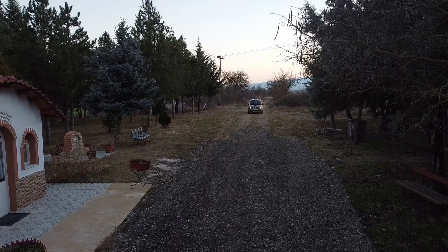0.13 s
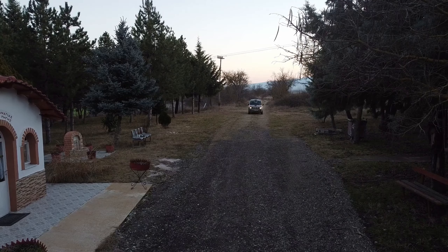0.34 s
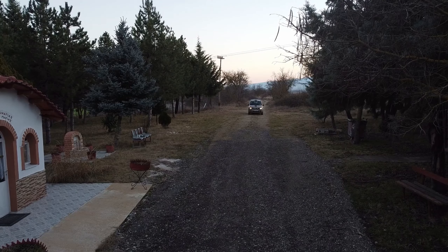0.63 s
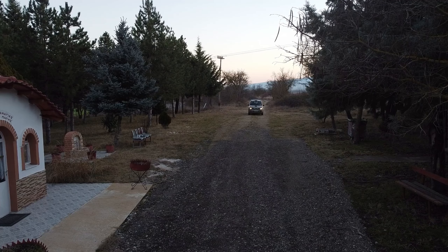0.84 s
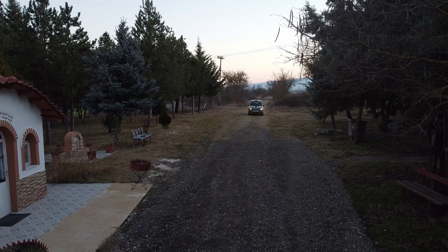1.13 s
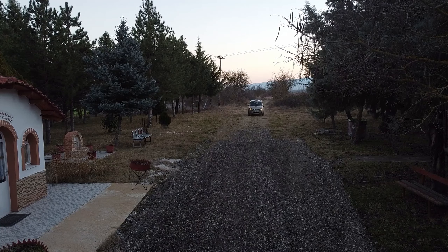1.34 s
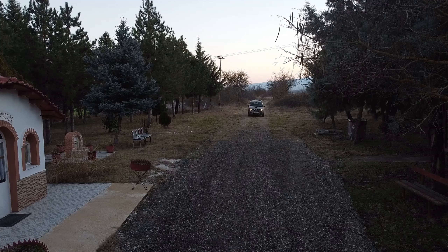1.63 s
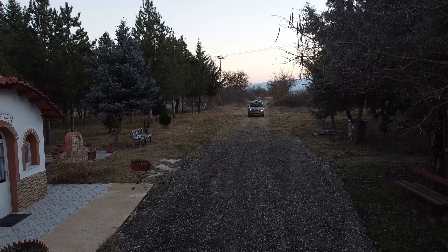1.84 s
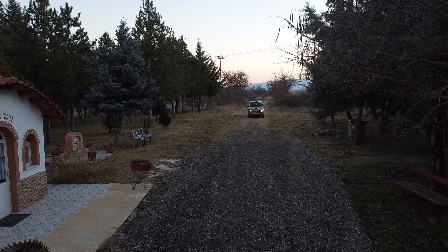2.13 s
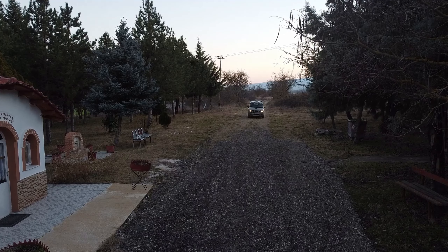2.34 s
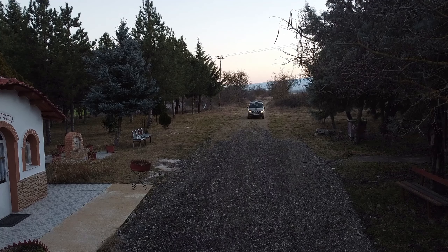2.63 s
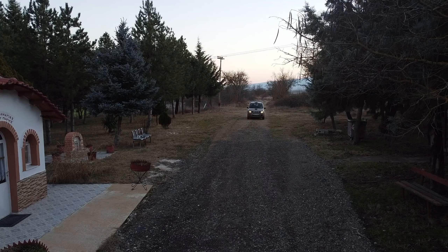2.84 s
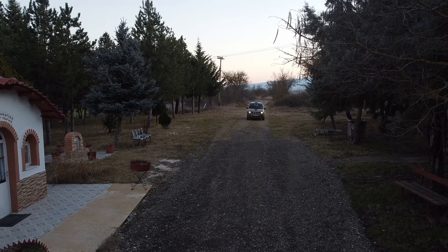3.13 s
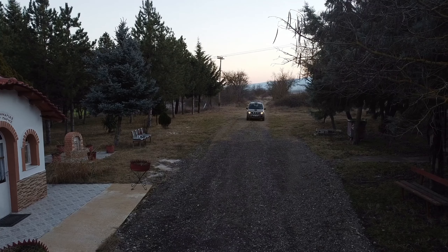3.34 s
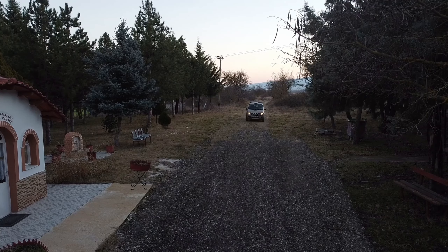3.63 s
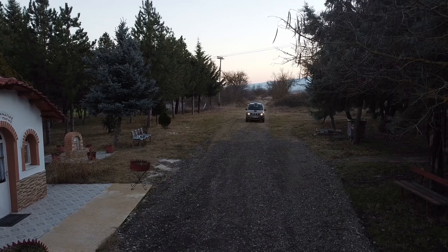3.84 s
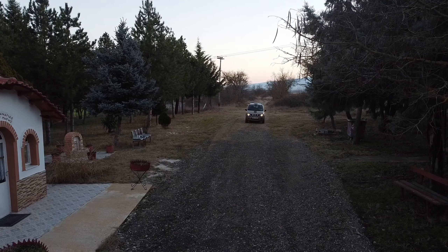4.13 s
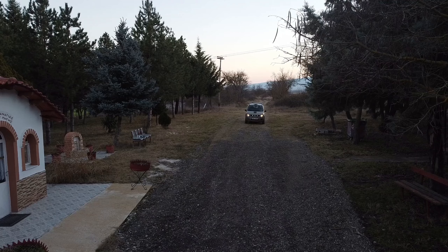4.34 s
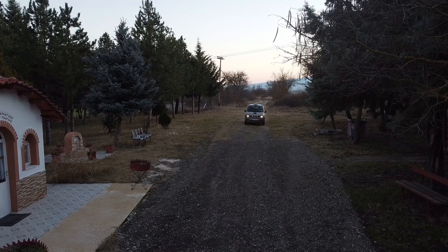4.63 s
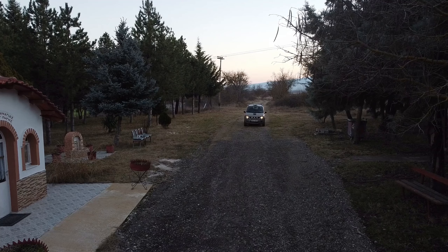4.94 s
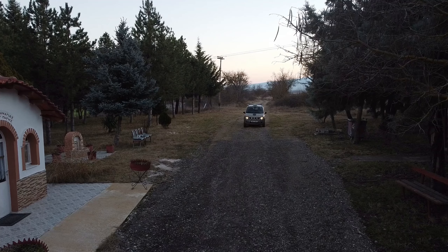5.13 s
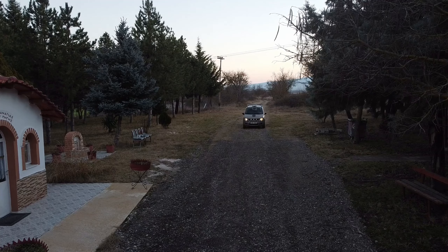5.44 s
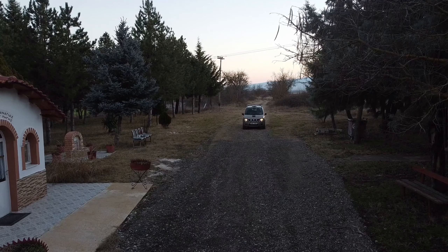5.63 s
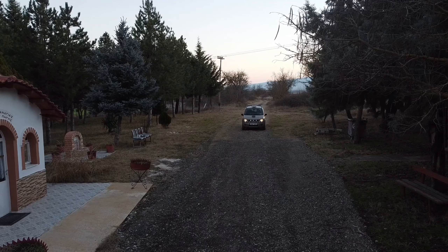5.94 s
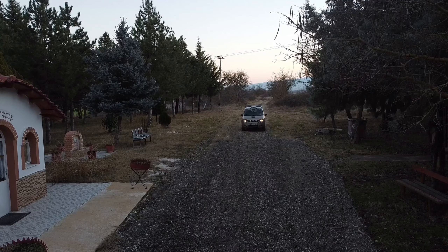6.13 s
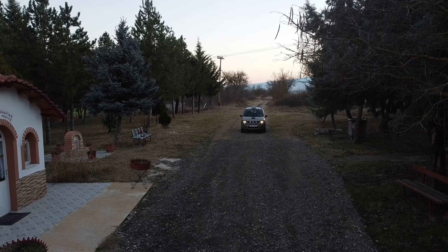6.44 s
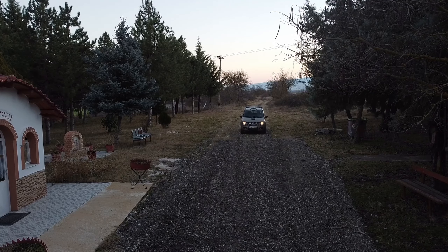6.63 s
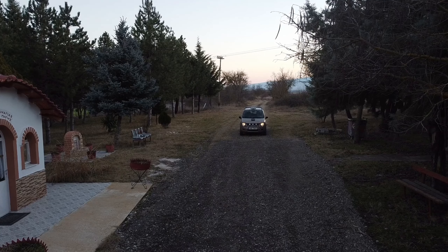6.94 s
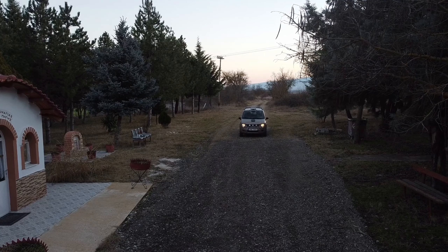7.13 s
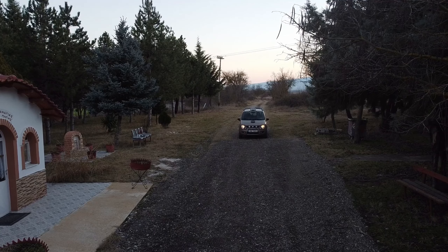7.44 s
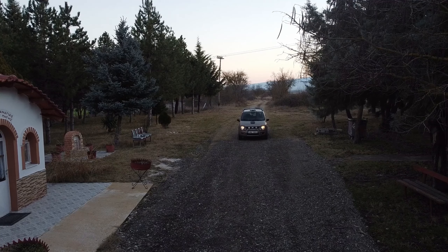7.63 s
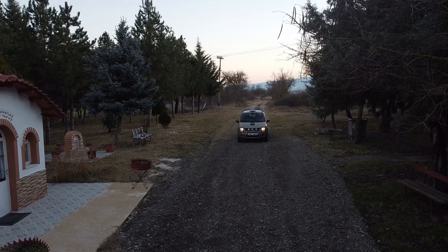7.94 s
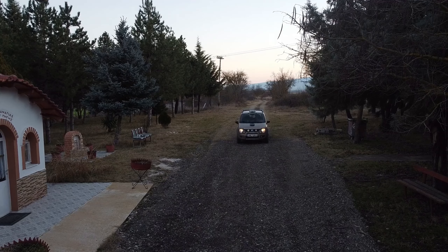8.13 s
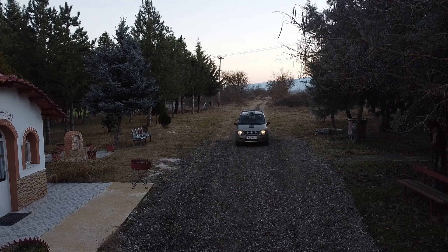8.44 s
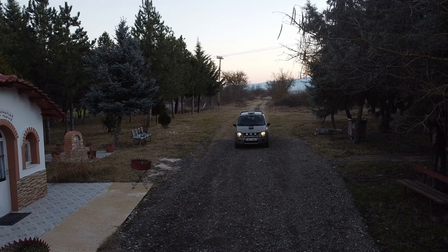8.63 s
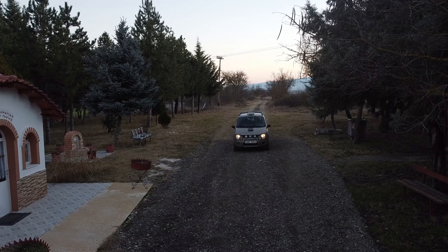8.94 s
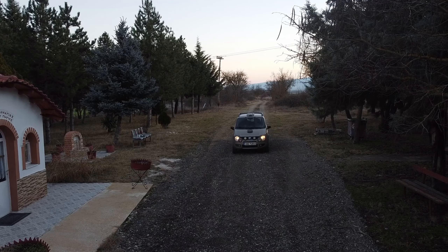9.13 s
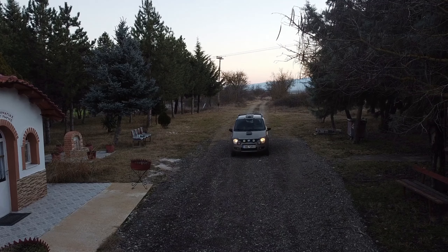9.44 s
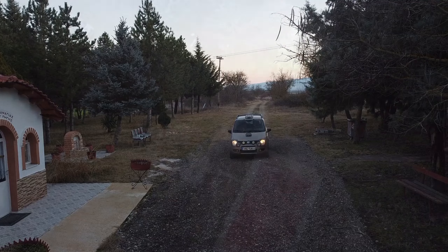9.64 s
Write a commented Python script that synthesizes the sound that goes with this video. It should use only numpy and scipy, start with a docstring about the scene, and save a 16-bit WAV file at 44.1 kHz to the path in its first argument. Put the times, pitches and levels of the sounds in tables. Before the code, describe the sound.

Quiet open air, and a car's tyres quickly begin crunching loose gravel, heard close and dry, with a slight stereo spread. From 0.5 seconds blunt stone pops multiply; a heavy one lands at 1.5, and crunching is densest around 1.5 to 2.7. Beneath, a low engine hum slides down in pitch over the first four seconds, then holds and throbs about three times a second over soft tyre rumble. Bright chips tick at 3.0 and 3.2, and a tight burst of hard snaps comes at 4.4. Sparser pops, grit and ticks continue, with one clear tick at 6.6. After 7.1 the engine and gravel ease, fading almost away by 8.7, with soft low thumps near 8.9 and 9.1. At 9.3 a close, quiet idle cuts in abruptly: steady low tones, grainy clatter, a few knocks and faint thin whines to the end.

```python
"""Outdoors on a loose gravel track, a car rolls slowly and eases to a crawl.
Stones crunch over fine grit as filtered random impulses; popped stones are blunt clicks that ring the tyre.
Flung chips tick as bright resonant clicks. The engine is four gliding tones that sink, throb and fade.
Shaped noise gives tyre rumble and air, decaying sines give soft thumps, wavering sines give faint whines.
Near the end a close idle cuts in: low steady tones, grainy clatter and a few knocks, with a thin whine."""
import sys
import numpy as np
from scipy import signal
from scipy.fft import rfft, irfft, next_fast_len
from scipy.io import wavfile
from scipy.ndimage import uniform_filter1d

SR = 44100
rng = np.random.default_rng(int(sys.argv[2]) if len(sys.argv) > 2 else 0)


def wrap_up_sound(samples):
    """Save the sound to the file named by the first command line argument, as 16-bit audio."""
    columns = np.atleast_2d(samples).T
    # keep every value between -1 and 1, then stretch to whole-number steps
    tamed = np.clip(columns, -1, 1)
    steps = np.round(tamed * 32767).astype(np.int16)
    wavfile.write(sys.argv[1], SR, steps)


N = 430857
T = np.arange(N) / SR
TAP_HZ = np.fft.rfftfreq(1024, 1 / SR)  # frequencies at which clicks and filters are drawn


# how hard the tyres work the gravel, before trims and swells:
# time_s (values glide between rows), crunch_db, grit_db
GRAVEL_LEVELS = [(0, -44, -53), (.55, -36, -50.5), (1.05, -37.5, -49.5), (1.35, -33, -48.5),
                 (1.9, -32.5, -48), (2.35, -29.5, -45), (2.8, -35.5, -47), (3.7, -36, -48.5),
                 (4.5, -34, -50), (5.05, -38.5, -50.5), (5.9, -37.5, -51), (6.7, -34, -48.5),
                 (7.1, -35.5, -49), (7.5, -37, -53.5), (8, -41.5, -56.5), (8.38, -49, -61),
                 (8.56, -59, -71), (8.75, -65, -76.5), (8.85, -58, -62), (9.27, -74, -74)]
# spectrum of the crushed stones: pitch_hz, level_db (relative, per Hz)
CRUNCH_SPECTRUM = [(100, -17.5), (230, 0), (380, 0), (490, 4), (580, -2), (730, -1), (830, -3.5),
                   (1000, 1.5), (1150, -3.5), (1580, -6.5), (1760, -17.5), (2500, -16.5), (4000, -32.5),
                   (9000, -50)]
# spectrum of the fine grit: pitch_hz, level_db (relative, per Hz)
GRIT_SPECTRUM = [(700, -34.5), (1800, 7), (2700, 2.5), (4000, -2.5), (6000, -8.5), (8000, -12.5),
                 (9900, -19), (10700, -17), (12500, -24), (16000, -28)]


def gravel(grit_trim_db=1.5, crunch_clump_db=1.13, grit_clump_db=1.5, lurch_db=0.88):
    """The tread crushes stones in clumps; each clump also stirs the fine grit."""
    clumps = crumbles(per_s=55, fade_s=.012)
    grit_clumps = evened(clumps + wander(per_s=50))
    lurch = lurch_db * wander(per_s=9)
    crunch_swell, grit_swell = swells_and_lulls() + lurch
    crunch = grains(CRUNCH_SPECTRUM, per_s=1300, spread_db=2.9, low_hz=380, high_hz=3000,
                    focus_db=16, bed=.5, ring_q=12)
    grit = grains(GRIT_SPECTRUM, per_s=1300, spread_db=3.0, low_hz=1700, high_hz=10000,
                  focus_db=16, bed=.55, smooth_hz=8000, ring_q=40, count=40)
    crunch *= gain_of(curve(GRAVEL_LEVELS) + crunch_swell + crunch_clump_db * clumps)
    grit_level_db = curve(GRAVEL_LEVELS, column=2) + grit_swell + grit_trim_db
    grit *= gain_of(grit_level_db + grit_clump_db * grit_clumps)
    return crunch + grit


# brief swells and lulls in the gravel: middle_s, length_s, crunch_swell_db, grit_swell_db
GRAVEL_SWELLS = [(0.146, 0.12, 6.5, 1.5), (0.626, .14, 3, 1.5), (1.43, 0.11, 4.5, -1.5),
                 (1.594, .08, -2.5, -1), (1.67, 0.097, 4.5, 1), (1.792, .08, 1, 1), (1.994, .07, 3, 1.5),
                 (2.116, 0.062, 4, 1), (2.228, 0.055, -2.5, -2), (2.39, 0.056, 2, 2), (3.563, 0.11, 2.5, 3),
                 (3.7, 0.16, 6.5, 2), (4.39, 0.19, 6, 6), (4.676, 0.09, 4.5, 3.5), (5.543, 0.22, 3.5, 5),
                 (5.723, 0.088, 2, 6), (5.931, .2, 1.5, -4), (6.172, 0.26, 2, 1), (6.807, 0.16, 0, 4.5),
                 (7.1, 0.14, 3.5, 0.5), (8.21, 0.13, 0, 3)]


def swells_and_lulls():
    """Each row is a smooth swell or dip in dB, one for the crunch and one for the grit."""
    swells = np.zeros((2, N))
    for middle_s, length_s, crunch_db, grit_db in GRAVEL_SWELLS:
        bump = np.cos(np.pi * np.clip((T - middle_s) / length_s, -.5, .5)) ** 2
        swells += np.outer([crunch_db, grit_db], bump)
    return swells


def crumbles(per_s, fade_s):
    """Stones give way in clumps that start at once and die down: a level of mean 0 and rms 1."""
    slips = rng.uniform(0.37, 1, N) * (rng.random(N) < per_s / SR)
    energy = signal.lfilter([1], [1, -np.exp(-1 / (fade_s * SR))], slips)
    level = np.sqrt(energy)
    return evened(level - level.mean())


# knocks: stones popping from under a tyre, then (from 9.315 s) knocks in the idle:
# start_s, peak_db, brightness_hz, dullness_db (lost an octave above the brightness),
# ring_db (before trim)
KNOCKS = [(.379, -23, 1000, 12, -41), (0.4484, -13, 950, 5, -40), (.4587, -17, 800, 13, -46),
          (.602, -21, 950, 10, -40), (0.6068, -11, 1000, 6, -34), (0.6114, -16.5, 1030, 8, -35),
          (0.6258, -19, 800, 10, -40), (0.6494, -15.5, 1030, 4, -38), (0.6563, -17, 1450, 16, -42),
          (.692, -13, 990, 9, -35), (.7783, -12.5, 1150, 20, -34), (.785, -16.5, 1100, 16, -34),
          (1.1786, -18, 1500, 3, -46), (1.1963, -18.5, 1100, 10, -39.5), (1.3292, -15.5, 1327, 7, -43),
          (1.3446, -15, 870, 4, -42), (1.4056, -17, 980, 4, -27.5), (1.489, -4, 800, 7.5, -15.5),
          (1.4948, -11, 665, 11, -22), (1.5024, -17, 800, 5, -24), (1.516, -17, 900, 6, -24),
          (1.662, -27, 699, 6, -25), (1.745, -15.5, 1200, 9, -28), (1.7715, -18, 1000, 8, -33),
          (1.8216, -6.5, 790, 12, -22), (1.9828, -15.5, 793, 6, -36), (1.9904, -15, 1100, 12, -31),
          (2.1005, -21, 2190, 8, -44), (2.1127, -14, 1090, 6, -27), (2.1225, -14, 1100, 6, -33),
          (2.1522, -12.5, 680, 8, -25), (2.2005, -15, 1100, 12, -32), (2.274, -13, 600, 6, -24),
          (2.3256, -13, 942, 8, -31), (2.3933, -12.5, 1000, 8, -29), (2.441, -14, 600, 10, -25),
          (2.5234, -19, 1200, 4, -40), (2.611, -18, 1000, 8, -35), (2.6799, -21, 1100, 6, -38),
          (2.7015, -16.5, 1987, 3, -43), (3.1597, -20, 960, 5, -23), (3.1714, -12, 430, 6.5, -13),
          (3.55, -19, 1100, 4, -38), (3.8388, -16.5, 1000, 11, -35), (4.0768, -15, 950, 13, -25),
          (4.087, -19, 1000, 13, -27), (4.3626, -10.5, 1347, 8, -37), (4.3775, -16, 1300, 5, -40),
          (4.3815, -6, 1750, 9, -27), (4.3897, -10, 1260, 4, -21), (4.3986, -6.5, 990, 3.5, -24),
          (4.4075, -17, 1000, 9, -32), (4.4135, -15, 700, 7, -34), (4.421, -15, 1100, 10, -26),
          (4.4285, -19, 890, 9, -22), (4.4336, -18, 1100, 5, -35), (4.498, -32, 480, 9, -15),
          (4.6785, -21, 600, 9, -30), (4.6905, -11.5, 990, 10, -42), (4.8694, -23, 1597, 2.5, -46),
          (5.15, -23, 1960, 5, -41), (5.2294, -23, 1000, 10, -40), (5.2699, -21.5, 625, 5, -28),
          (5.344, -21.5, 1100, 14, -35), (5.5663, -19.5, 1100, 9, -38), (5.9252, -24, 1000, 8, -42),
          (6.1185, -17, 786, 6, -29), (6.1442, -17.5, 1170, 6, -41), (6.208, -21, 1100, 10, -37),
          (6.2142, -19, 1000, 13, -38), (6.3723, -21, 1100, 7, -39), (6.4995, -23, 1000, 8, -36),
          (6.792, -20, 1000, 7, -33), (6.9159, -17, 1150, 7, -44), (7.0545, -18, 1210, 6, -45),
          (7.092, -19, 750, 7, -32), (7.1116, -17, 1470, 9, -31), (7.199, -34, 587, 7, -25),
          (7.4641, -27, 800, 4, -31), (7.5946, -29, 550, 3, -24), (7.6997, -26, 700, 10, -29),
          (8.0568, -32, 1100, 10, -48), (8.1846, -30, 2202, 4, -58), (8.2628, -24, 1390, 17, -50),
          (8.301, -31, 960, 9, -50), (8.3451, -28, 1000, 11, -52), (8.387, -35, 1100, 9, -53),
          (8.517, -35.5, 900, 10, -58), (8.6127, -36.5, 1200, 14, -59), (8.788, -45, 950, 12, -60),
          (9.315, -31, 650, 8, -39), (9.353, -33, 950, 6, -42), (9.381, -28.5, 1700, 8, -43),
          (9.513, -43, 1200, 6, -52), (9.64, -33, 1100, 4, -46), (9.6942, -35, 1000, 10, -50)]
# the muffled colour of a knock, dull above the tyre's highest mode: pitch_hz, level_db (relative)
KNOCK_SPECTRUM = [(150, -5), (480, 5), (1550, 0.5), (1800, -7), (3300, -5.5), (3900, -11), (12000, -26.5)]
# what a struck tyre rings with: pitch_hz (before random detuning), level_db (relative), t60_s
TYRE_MODES = [(240, -11.5, 0.063), (350, -7, 0.04), (495, 1, 0.053), (618, -8, 0.03), (1030, -2, 0.083),
              (1570, -15, 0.024)]


def pops_and_knocks(ring_trim_db=3, low_loss_db=3, rattle_db=-9, reach_db=13, ring_rise_s=0.0013,
                    rattle_hz=2400, glance_db=2.0):
    """Popping stones, later knocks in the idle: a blunt click, a ring of low modes, a diffuse rattle."""
    snaps, rings, t = np.zeros(N), np.zeros(N), np.arange(SR // 8) / SR
    mode_hz, mode_db, t60_s = np.transpose(TYRE_MODES)[:, :, None]
    ring_rise = 1 - np.exp(-t / ring_rise_s)
    for start_s, peak_db, bright_hz, dull_db, ring_db in KNOCKS:
        away = octaves(bright_hz)
        loss_db = np.minimum(np.where(away < 0, low_loss_db, dull_db) * away ** 2, 50)
        snap = click(read(KNOCK_SPECTRUM, TAP_HZ) + facets(depth_db=3) - loss_db)
        snap *= gain_of(peak_db) * rng.choice([-1, 1]) / abs(snap).max()
        add(snaps, start_s - np.argmax(abs(snap)) / SR, snap)  # the peak lands on start_s
        # a dull blow hardly reaches the higher modes; a bright one stirs the lower slightly less
        slope_db = np.where(mode_hz > bright_hz, reach_db, glance_db)
        struck_db = mode_db - slope_db * abs(np.log2(mode_hz / bright_hz))
        detuned_hz = mode_hz * (1 + 0.037 * rng.standard_normal(mode_hz.shape))
        decay = gain_of(ring_db + ring_trim_db + struck_db - 60 * t / t60_s)
        ring = (decay * np.sin(2 * np.pi * detuned_hz * t)).sum(0)
        add(rings, start_s, ring_rise * ring)
    rattle = shaped(scatter(snaps, t60_s=0.14), 1 / np.hypot(1, (TAP_HZ / rattle_hz) ** 2))
    return snaps + rings + gain_of(rattle_db) * rattle


# chips striking each other: start_s, peak_db (before trim), brightness_hz,
# narrowness_db (lost an octave away)
CHIP_TICKS = [(0.077, -33, 2600, 20), (.1347, -30, 2960, 22), (.3358, -34, 2900, 14),
              (0.499, -27.5, 3300, 5), (.5812, -35, 4200, 20), (.6919, -24, 3390, 15),
              (1.179, -31, 4000, 9), (1.35, -24.5, 3780, 14), (1.4418, -28, 2800, 15),
              (1.8965, -26.5, 4700, 22), (2.003, -29, 4500, 12), (2.133, -32, 3800, 14),
              (2.166, -31, 4000, 12), (2.3176, -26, 3000, 12), (2.3878, -23, 3000, 11),
              (2.5633, -22, 2900, 20), (2.6665, -26, 2700, 18), (2.9005, -23.5, 3903, 7),
              (2.999, -17, 4040, 9), (3.1717, -13.5, 3450, 18), (3.1744, -27, 3900, 22),
              (3.2202, -29, 2900, 18), (3.582, -19, 3900, 6), (3.59, -28, 4500, 9), (3.717, -27, 3700, 10),
              (3.7904, -27, 2900, 16), (3.854, -18.5, 2540, 22), (3.944, -35, 4000, 13),
              (3.9834, -33, 3540, 13), (4.3826, -17, 2500, 30), (4.39, -24, 2290, 26),
              (4.399, -18, 2390, 26), (4.4342, -24, 3400, 26), (4.588, -30, 2700, 20),
              (4.658, -32, 4500, 9), (4.675, -24, 4400, 10), (4.6905, -29, 4800, 7), (4.8695, -25, 3520, 8),
              (4.8901, -30, 3300, 13), (4.9034, -29, 4590, 12), (4.9667, -24.5, 6000, 8),
              (5.054, -33, 5200, 18), (5.066, -19, 4990, 25), (5.1503, -25.5, 3700, 36),
              (5.492, -30, 5000, 8), (5.5563, -27, 3600, 10), (5.567, -28, 3400, 10), (5.708, -29, 3800, 8),
              (5.722, -28, 3800, 10), (5.7942, -32, 2900, 16), (6.0757, -33, 2900, 16),
              (6.1245, -28, 4000, 8), (6.365, -35, 4800, 10), (6.5875, -31, 3500, 13),
              (6.6453, -16, 2900, 8.5), (6.657, -34, 6000, 35), (6.7255, -30, 2800, 16),
              (6.7661, -26.5, 4096, 13), (6.806, -27, 4100, 9), (7.054, -31, 3800, 12),
              (7.0785, -28, 4500, 12), (7.085, -30, 4200, 10), (7.2346, -32, 4700, 26),
              (7.332, -27.5, 3690, 16), (7.5853, -34, 3500, 4), (7.6025, -37, 3300, 13),
              (7.7241, -32, 2700, 20), (7.7598, -34, 3000, 16), (7.9776, -31.5, 3200, 16),
              (8.0301, -36.5, 3000, 16), (8.148, -41, 4400, 20), (8.301, -39, 4200, 20),
              (8.3802, -42, 2900, 16), (8.8834, -49, 3190, 12)]


def chips(trim_db=-2.2, skitter_db=-4, ring_db=3, top_hz=9500):
    """Small flung stones tick brightly, ring for an instant and skitter on."""
    ticks = np.zeros(N)
    top_loss_db = 10 * np.log10(1 + (TAP_HZ / top_hz) ** 4)
    for start_s, peak_db, bright_hz, narrow_db in CHIP_TICKS:
        loss_db = np.minimum(narrow_db * octaves(bright_hz) ** 2, 40)
        tick = click(facets(depth_db=3) + ringing(bright_hz, ring_db, q=5.2) - top_loss_db - loss_db)
        add(ticks, start_s, gain_of(peak_db + trim_db) * tick / abs(tick).max())
    return ticks + gain_of(skitter_db) * scatter(ticks, t60_s=0.044)


# engine speed, before a slight wander: time_s (values glide between rows), firing_hz
FIRING_RATE = [(0, 49.3), (.6, 48.38), (1, 46.6), (1.9, 44.6), (2.2, 42.95), (3.1, 39.8), (3.6, 38.94),
               (4.2, 38.45), (5.2, 38.33), (6.1, 38.64), (6.9, 38.28), (7.6, 38.5), (8.3, 39.23)]
# engine effort, which also drives the rumble: time_s (values glide between rows), effort_db
ENGINE_EFFORT = [(0, -8), (.45, -1), (1.1, 0.5), (4.5, 0), (7.1, -1), (7.85, -8), (8.3, -11.5), (8.7, -17),
                 (9.25, -18.5)]
# what the exhaust makes of a tone at 0 dB effort: pitch_hz, level_db
EXHAUST_RESPONSE = [(38, -44), (42, -37), (47, -35), (78, -42.5), (93, -42), (118, -49.5), (140, -40),
                    (155, -34), (170, -34.5), (195, -35)]
# one beat of the boom per row: start_s, swell_db (steps are smoothed)
BOOM_BEATS = [(1.77, -0.5), (2.12, -0.5), (2.44, 0), (2.68, -1), (2.98, -1), (3.3, -1.5), (3.55, -1.5),
              (3.88, -.5), (4.19, 0), (4.5, -1.5), (4.78, -1.5), (5.14, -1), (5.41, 0.5), (5.75, 0.5),
              (6.12, -1.5), (6.44, 0), (6.8, 0), (7.22, -0.5), (7.66, 0), (8.07, -1), (8.4, -1)]
# strength of the close neighbour that beats with the boom:
# time_s (values glide between rows), share (of the boom's amplitude)
NEIGHBOUR_SHARE = [(1.7, 0), (2.3, .5), (3.2, .8), (8.1, .85), (8.5, 0)]


def engine(uneven_db=0.8, stumble_rad=0.12):
    """Four firing tones slide through the exhaust's resonances; the fourth beats with a neighbour."""
    firing_hz = curve(FIRING_RATE) * (1 + 0.0025 * wander(per_s=8))
    turn = 2 * np.pi * np.cumsum(firing_hz) / SR
    tones = []
    for k in range(1, 5):
        level = gain_of(read(EXHAUST_RESPONSE, k * firing_hz) + uneven_db * wander(per_s=14))
        phase = k * turn + stumble_rad * wander(per_s=49) + rng.uniform(0, 2 * np.pi)
        tones.append(level * np.exp(1j * phase))
    starts, swell_db = np.transpose(BOOM_BEATS)
    beat = np.interp(T, starts, np.arange(len(starts)))  # beats counted so far
    boom_swell_db = uniform_filter1d(swell_db[beat.astype(int)], size=2000)
    beating = 1 - curve(NEIGHBOUR_SHARE) * np.exp(2j * np.pi * beat)
    tones[-1] *= gain_of(boom_swell_db) * beating
    return gain_of(curve(ENGINE_EFFORT)) * sum(tones).imag


# spectrum of the tyres' drumming: pitch_hz, level_db (relative, per Hz)
RUMBLE_SPECTRUM = [(20, -48), (42, -6), (70, 0), (105, -2), (155, -2.5), (200, -1.5), (270, -8), (400, -11),
                   (900, -23.5), (3000, -71)]


def rumble(full_effort_db=-37, follow=0.57, side_db=-6):
    """The tyres drum on the uneven track, wide and low, louder as the car pulls harder."""
    sides = gain_of(side_db) * noise(RUMBLE_SPECTRUM) * np.array([[1], [-1]])
    level_db = full_effort_db + follow * curve(ENGINE_EFFORT)
    return gain_of(level_db) * (noise(RUMBLE_SPECTRUM) + sides)


# the body thumps softly over ruts as the car creeps: start_s, peak_db (of the envelope), pitch_hz
RUT_THUMPS = [(8.882, -39, 135), (9.072, -37, 115), (9.113, -37, 136.2)]


def thumps(swell_s=0.0061):
    """Each thump is a few low cycles that swell and die."""
    out, t = np.zeros(N), np.arange(SR // 8) / SR
    envelope = t / swell_s * np.exp(1 - t / swell_s)
    for start_s, peak_db, pitch_hz in RUT_THUMPS:
        add(out, start_s, gain_of(peak_db) * envelope * np.sin(2 * np.pi * pitch_hz * t))
    return out


# tones of the close idle: multiple (of the firing rate), peak_db (before a slight wander)
IDLE_TONES = [(1, -50.5), (2, -43), (3, -46), (4, -43), (5, -43.5), (6, -57), (9, -56)]
# spectrum of its clatter: pitch_hz, level_db (relative, per Hz)
CLATTER_SPECTRUM = [(25, -26), (70, -18), (130, -6), (175, -5), (225, 0), (270, -6), (390, -9.5),
                    (490, -6.5), (700, -16), (1050, -13), (1800, -19.5), (3000, -23.5), (5200, -31.5),
                    (9000, -40), (15500, -45)]


def idle(start_s=9.312, firing_hz=34.9, clatter_db=-45.5, extra_db=4, settle_s=0.11, beat=0.11):
    """The close idle: steady low tones, and clatter that starts louder and swells with each firing."""
    turn = 2 * np.pi * np.cumsum(firing_hz * (1 + 0.0041 * wander(per_s=20))) / SR
    tones = np.zeros(N)
    for k, peak_db in IDLE_TONES:
        tones += gain_of(peak_db + wander(per_s=12)) * np.cos(k * turn + rng.uniform(0, np.pi))
    clatter = grains(CLATTER_SPECTRUM, per_s=2000, spread_db=2.5, low_hz=400, high_hz=5000,
                     focus_db=4, bed=1)
    settling = np.exp(-np.maximum(T - start_s, 0) / settle_s)
    clatter *= gain_of(clatter_db + extra_db * settling) * (1 + beat * np.cos(turn))
    gate = np.clip((T - start_s) / 0.003, 0, 1)
    return tones * gate, clatter * gate


# thin whines: start_s, end_s, pitch_hz, width_hz (twice the rms pitch wander), level_db (rms)
THIN_WHINES = [(4.121, 4.311, 10700, 700, -67), (5.029, 5.25, 10850, 70, -66.5),
               (6.679, 7.0, 10750, 700, -69), (9.33, 9.5, 10853, 17, -73), (9.517, 9.767, 10853, 14.8, -70),
               (9.36, 9.5, 5200, 190, -69), (9.55, 9.77, 5211, 190, -68.5)]


def whines(fade_s=0.027):
    """Faint high whines come and go, each a sine whose pitch wavers quickly."""
    out = np.zeros(N)
    for start_s, end_s, pitch_hz, width_hz, level_db in THIN_WHINES:
        wavering_hz = pitch_hz + width_hz / 2 * wander(per_s=600)
        tone = np.sqrt(2) * np.sin(2 * np.pi * np.cumsum(wavering_hz) / SR)
        fade = np.clip(np.minimum(T - start_s, end_s - T) / fade_s, 0, 1)
        out += gain_of(level_db) * tone * fade
    return out


# spectrum of the open air: pitch_hz, level_db (relative, per Hz)
AIR_SPECTRUM = [(20, -40), (45, -18), (140, -3), (260, -8), (500, -24), (1100, -19), (2000, -24),
                (4000, -37), (8000, -37), (15800, -38)]


def air(level_db=-54, side_db=-10):
    """Quiet open-air background: steady noise, slightly wide."""
    sides = gain_of(side_db) * noise(AIR_SPECTRUM) * np.array([[1], [-1]])
    return gain_of(level_db) * (noise(AIR_SPECTRUM) + sides)


# side level by pitch: pitch_hz, side_db (against mid, before each layer's trim)
SIDE_LEVELS = [(100, -17), (300, -15), (500, -20), (1300, -20), (1900, -12), (3000, -21), (5500, -7),
               (8000, -43), (14000, -83)]


def widened(x, side_trim_db):
    """Adds a diffuse side signal, its level set by pitch."""
    size = next_fast_len(N)
    side_db = read(SIDE_LEVELS, np.fft.rfftfreq(size, 1 / SR)) + side_trim_db
    side = irfft(rfft(scatter(x, t60_s=0.026), size) * gain_of(side_db), size)[:N]
    return np.array([x + side, x - side])


def scatter(x, t60_s):
    """Sound thrown about by ground and wheel arch: a short diffuse tail of energy 1."""
    t = np.arange(SR // 4) / SR
    tails = rng.standard_normal((4, len(t))) * gain_of(-60 * t / t60_s) * (1 - np.exp(-t / .002))
    out = np.zeros(N)
    for k, tail in enumerate(tails):
        # the paths change as the car moves
        share = np.cos(np.pi * (3 * T + k / 4)) / np.sqrt(2)
        out += signal.oaconvolve(x * share, tail / np.linalg.norm(tail))[:N]
    return out


def grains(colour, per_s, spread_db, low_hz, high_hz, focus_db, bed, smooth_hz=6000, ring_q=8, count=24):
    """Grains of many sizes, each with its own band, over tiny contacts that take over in the treble."""
    centres = low_hz * (high_hz / low_hz) ** np.linspace(0, 1, count)
    bands = []
    for hz in centres:
        resonance_db = facets(depth_db=4) + ringing(hz, ring_db=12, q=ring_q)
        bands.append(resonance_db - focus_db * np.minimum(octaves(hz) ** 2, 2))
    bands = np.array(bands)
    bands -= 10 * np.log10((gain_of(bands) ** 2).sum(0))  # all sizes together make up the colour
    blow = gain_of(spread_db * np.minimum(rng.exponential(1, N), 3.5)) * rng.choice([-1, 1], N)
    force = blow * (rng.random(N) < per_s / SR)
    size_index, stones = rng.integers(0, count, N), np.zeros(N)
    for k, band in enumerate(bands):
        db = read(colour, TAP_HZ) + band
        impact = click(db) * np.linalg.norm(gain_of(db))
        stones += signal.oaconvolve(force * (size_index == k), impact)[:N]
    tiny = bed + (TAP_HZ / smooth_hz) ** 2  # tiny contacts against single grains
    stones = shaped(evened(stones), 1 / np.hypot(1, tiny))
    return evened(stones + shaped(noise(colour), tiny / np.hypot(1, tiny)))


def facets(depth_db, count=44):
    """Every stone has its own uneven set of resonances."""
    knots = np.linspace(np.log(200), np.log(SR / 2), count)
    return depth_db * np.interp(np.log(TAP_HZ + 1), knots, rng.standard_normal(count))


def ringing(centre_hz, ring_db, q):
    """A stone's main resonance: a narrow peak in dB over its click."""
    detune = 2 * q * (TAP_HZ / centre_hz - 1)
    return 10 * np.log10(1 + gain_of(ring_db) ** 2 / (1 + detune ** 2))


def click(db):
    """The sharpest causal (minimum-phase) click with the spectrum db, of energy 1."""
    log_gain = np.log(gain_of(np.maximum(db - db.max(), -80)))
    circle = np.concatenate([log_gain, log_gain[-2:0:-1]])
    taps = np.fft.ifft(np.exp(signal.hilbert(circle).conj())).real
    return taps / np.linalg.norm(taps)


def octaves(centre_hz):
    """Distance of each click frequency from a centre, in octaves."""
    return np.log2((TAP_HZ + 1) / centre_hz)


def shaped(x, gain):
    """Filters x by a gain given at the click frequencies."""
    size = next_fast_len(N)
    return irfft(rfft(x, size) * np.interp(np.fft.rfftfreq(size, 1 / SR), TAP_HZ, gain), size)[:N]


def noise(colour):
    """Steady noise with the given spectrum, rms 1."""
    size = next_fast_len(N)
    gain = gain_of(read(colour, np.fft.rfftfreq(size, 1 / SR)))
    return evened(irfft(rfft(rng.standard_normal(size)) * gain, size)[:N])


def wander(per_s):
    """Smooth chance of rms 1 that changes about per_s times a second."""
    knots = np.random.default_rng(rng.integers(2 ** 31)).standard_normal(N // 16)
    return evened(np.interp(T * per_s, np.arange(len(knots)), knots))


def gain_of(db):
    """Decibels to amplitude."""
    return 10 ** (np.asarray(db) / 20)


def evened(x):
    """Scales to rms 1."""
    return x / np.sqrt(np.mean(x ** 2) + 1e-20)


def curve(rows, column=1):
    """One column of a control table at every sample, gliding between rows."""
    rows = np.asarray(rows)
    return np.interp(T, rows[:, 0], rows[:, column])


def read(points, hz):
    """A spectrum table on a log-frequency axis."""
    f, value = np.transpose(points)
    return np.interp(np.log(hz + 1), np.log(f + 1), value)


def add(mix, start_s, sound):
    """Mixes a sound in at start_s."""
    part = mix[max(round(start_s * SR), 0):][:len(sound)]
    part += sound[:len(part)]


def scene():
    """Gravel, chips and clatter spread a little; the pops, knocks and engine stay near the middle."""
    idle_tones, clatter = idle()
    stones = widened(gravel() + chips() + clatter, side_trim_db=-0.5)
    knocking = widened(pops_and_knocks(), side_trim_db=-7.0)
    return stones + knocking + engine() + rumble() + thumps() + idle_tones + whines() + air()


def record(dry, edge_hz=15850):
    """The recorder's band limit: a steep low-pass."""
    lowpass = signal.firwin(511, edge_hz, window=("kaiser", 9), fs=SR)
    return signal.oaconvolve(dry, lowpass[None], "same")


dry = scene()
out = record(dry)
wrap_up_sound(out)
```